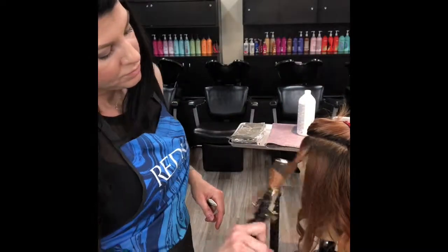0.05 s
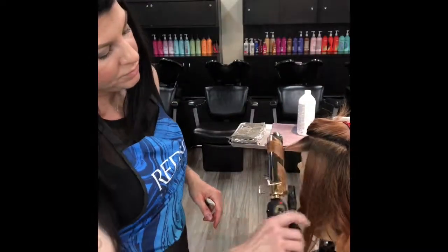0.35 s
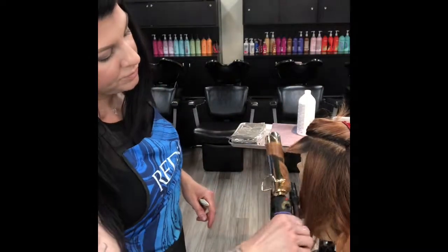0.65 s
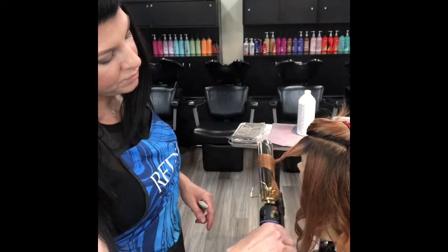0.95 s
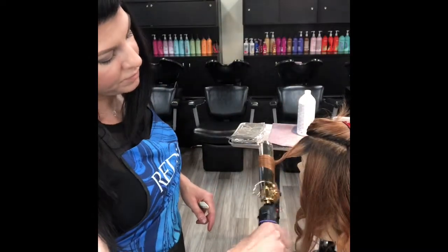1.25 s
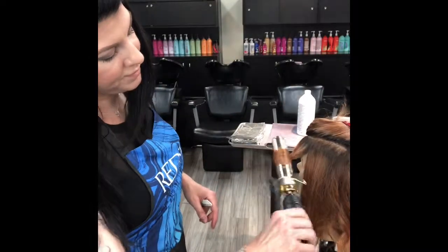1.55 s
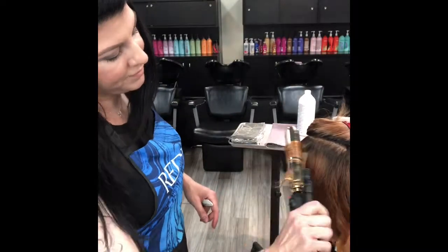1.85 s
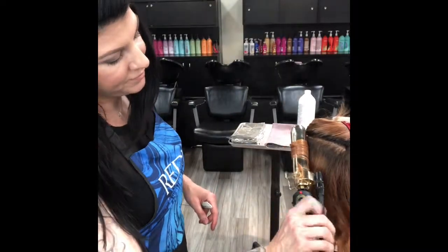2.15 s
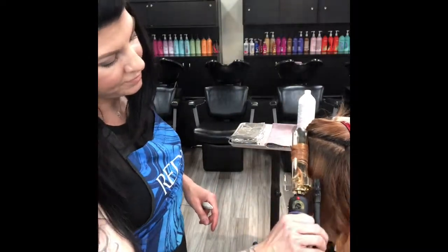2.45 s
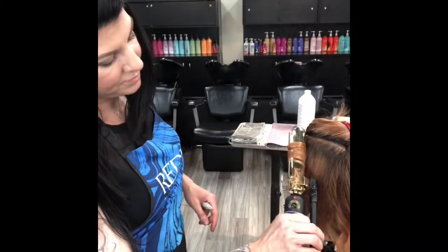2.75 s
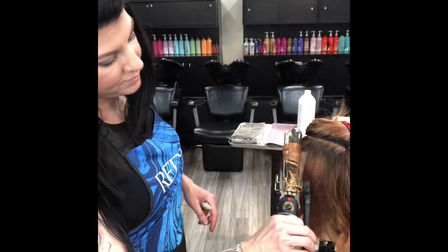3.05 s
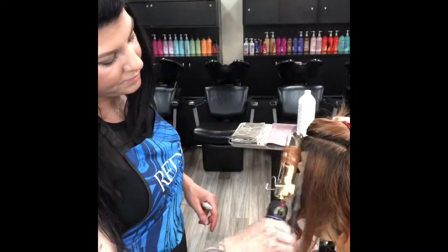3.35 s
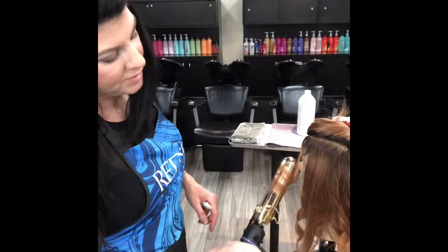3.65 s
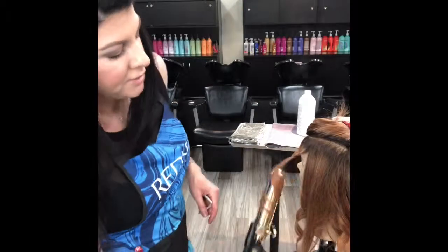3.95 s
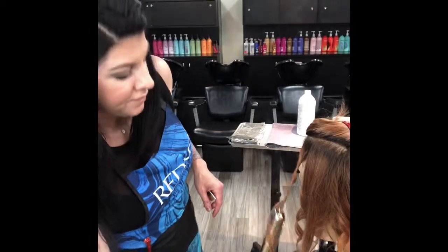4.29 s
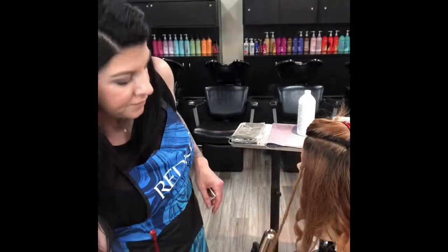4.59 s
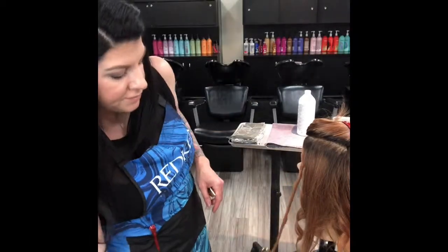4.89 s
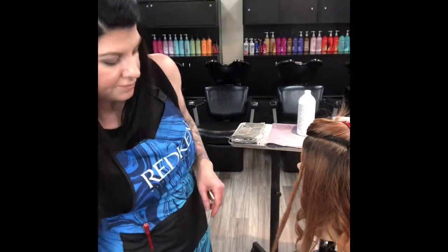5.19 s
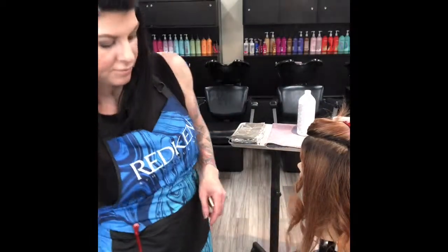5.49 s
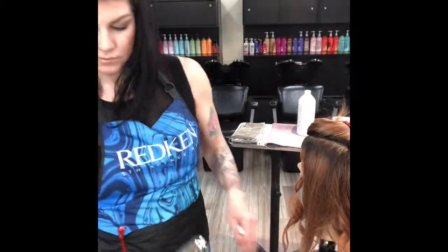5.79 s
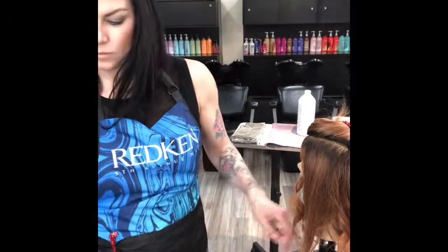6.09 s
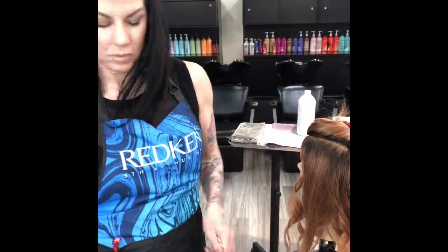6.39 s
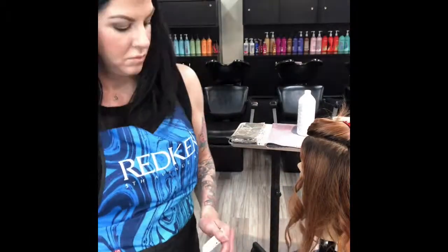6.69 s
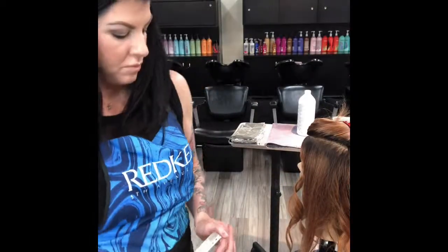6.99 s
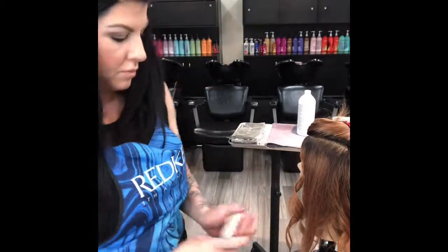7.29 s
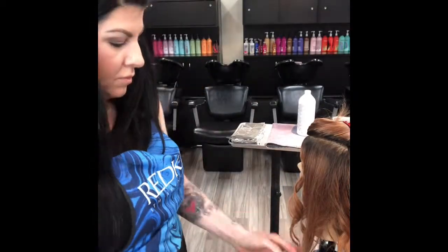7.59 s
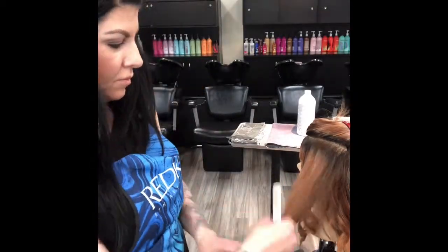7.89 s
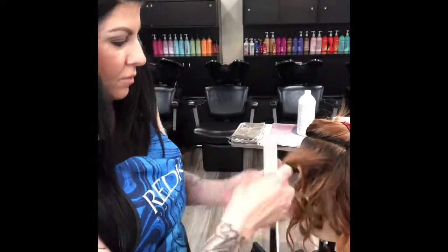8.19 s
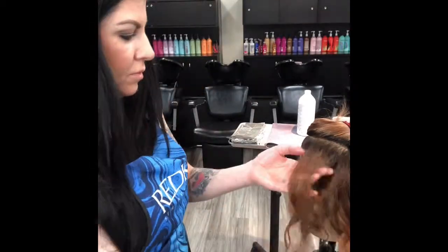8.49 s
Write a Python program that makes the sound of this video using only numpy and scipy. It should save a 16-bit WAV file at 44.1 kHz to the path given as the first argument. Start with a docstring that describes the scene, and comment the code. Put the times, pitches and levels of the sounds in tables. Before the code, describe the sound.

A curling iron clicks faintly in hair over low ventilation, then is put down with a loud clatter.

```python
"""Small scratchy ticks and a soft rustle come from close by: a curling iron turns in hair in a quiet salon.
Impacts in its sprung clamp and handle excite brief resonances, hair and clothes hiss with friction,
and the emptied clamp snaps shut. Then the iron is put down with a loud clatter, each landing ringing
the work station and the iron's steel stand. Under it all runs the low rush of the ventilation."""
import sys
import numpy as np
from scipy import signal
from scipy.fft import rfft, irfft
from scipy.io import wavfile
from scipy.ndimage import uniform_filter1d

SR = 44100
rng = np.random.default_rng(int(sys.argv[2]) if len(sys.argv) > 2 else 0)


def to_wav(s):
    """Save 16-bit WAV."""
    ch = np.atleast_2d(s).T  # columns
    pcm = np.round(np.clip(ch, -1, 1) * 32767)  # PCM
    wavfile.write(sys.argv[1], SR, pcm.astype(np.int16))


N = 376702
RING_T = np.arange(SR // 5) / SR  # time axis of one impact, in seconds

# Modes of the iron's barrel. Each row: frequency in Hz, level in dB, 60 dB decay time (t60) in seconds.
BARREL_MODES = [(2190, -11, 0.14), (2400, 0, 0.045), (2940, -13, .14), (3520, -10.5, 0.077),
                (4090, -16, 0.058), (5600, -11, 0.11), (5800, -8, 0.092), (6196, -26, 0.15),
                (7200, -21, .15), (10600, -22, 0.12)]
# Spectrum of metal striking a hard surface. Each row: frequency in Hz, spectral level in dB.
CRACK_SPECTRUM = [(100, 0), (900, -0.5), (1800, -4.5), (3500, -5), (5000, -7), (7300, -9.5), (8500, -12.5),
                  (16000, -17.5)]
# Friction spectrum of hair, also lent to the rattles. Each row: frequency in Hz, spectral level in dB.
HAIR_SPECTRUM = [(200, -23.5), (700, 7), (1500, 5), (2600, 2), (5000, -0.5), (7500, -5), (8500, -10.5),
                 (12000, -12), (16000, -12.5)]


def clamp_ticks(level_db=-1.57, notes_db=-1, barrel_db=-24, spring_db=-17, bounce_db=-10,
                part_t60=.019, spring_t60=.013, spring_hz=(10770, 15700)):
    """Impact excitation: a part of the clamp or handle bites and bounces, ringing barrel and spring too."""
    # Each row: start in seconds, level in dB, tilt in dB per octave, chatter t60 and rise time in
    # seconds, main note in Hz, its relative level in dB, second note in Hz, its relative level in dB.
    ticks = [(.065, -81.5, -11.5, 0.057, .003, 1150, 5, 1390, -1),
             (.114, -62.5, -0.5, .029, 0.00053, 5400, -3, 1900, -2),
             (0.145, -61.5, -1, .03, 0.0011, 2020, 3.5, 720, -1),
             (.179, -73, -2, .025, .001, 2050, -2, 3170, -2),
             (.266, -72, 6.5, 0.055, .0005, 5300, 1, 15000, -2),
             (.279, -70.5, 3, .04, .001, 5950, -3, 1500, -1), (.315, -68, 4, 0.049, .002, 1030, 5, 1300, 1),
             (.341, -71, 0, 0.022, .001, 1740, -1, 1450, -3),
             (.352, -70.5, 2, .045, .002, 3190, -5, 1750, -2),
             (.376, -70.5, 4, 0.034, .002, 1550, 3, 2590, -9),
             (.665, -78.5, 4, .025, .001, 4840, -2, 15000, -3),
             (.694, -72.5, -1.5, 0.1, .001, 3330, -4, 1720, -8),
             (1.068, -75, -2, .026, .002, 4550, -1, 1870, -3),
             (1.256, -80, 3, .04, .002, 5860, -7, 3900, -5),
             (1.341, -73, 4.5, .081, .001, 5030, -1, 3690, -9),
             (1.403, -71, 2, .06, .003, 5770, -3, 3600, -5),
             (1.412, -63.5, -0.5, 0.024, 0.0013, 1670, -1, 1310, -3),
             (1.44, -71, -1, .04, .003, 2540, 3, 1900, -1), (1.478, -83, -2, .03, .002, 1500, -2, 2700, -5),
             (1.5, -65, -2.5, 0.011, 0.00079, 1300, -3, 3930, -4),
             (1.529, -76, -6, .02, .0015, 920, 2, 1480, 0),
             (1.563, -69.5, 6.5, 0.024, .001, 6250, -4, 2780, -4),
             (1.63, -63.5, -1.5, 0.027, 0.00041, 1020, 4.5, 3060, -3),
             (1.641, -68, -0.5, 0.039, .0015, 1140, 0, 2530, -5),
             (1.75, -66.5, -2, .051, .003, 3000, -2, 1230, -8),
             (1.765, -62.5, 0, .045, .0025, 1350, -1, 3470, -2),
             (1.779, -62.5, 2.5, .026, .0007, 6000, -5, 3900, -2),
             (1.8, -72, -3.5, .023, .001, 1335, 4, 1900, -2),
             (1.837, -73, -2, .025, .002, 2340, 4, 1100, 2), (1.852, -71, -4, 0.036, .001, 760, 2, 1140, 0),
             (1.923, -69.5, -1.5, 0.091, .001, 1280, -2, 2214, -4),
             (2.012, -65, 3.5, 0.05, .001, 3910, -5, 15000, -6),
             (2.215, -70, 5, .072, .002, 1340, -4, 6080, -9),
             (2.236, -64.5, 2, .1, .002, 5830, -9, 1770, -11),
             (2.359, -72, 2.5, 0.095, .003, 2490, -7, 4840, -5),
             (2.417, -75, 0, .02, .001, 5600, -5, 1490, -6),
             (3.4488, -70, 5, .028, .0005, 2540, -7, 870, -5),
             (3.462, -66, 3, 0.044, .003, 2330, 0, 4940, -11),
             (3.469, -68, 1.5, .03, .001, 1410, 0, 5000, -8),
             (3.652, -69, 3, 0.02, .0015, 5600, -3, 12600, -4),
             (3.718, -73, 3, .02, .001, 1150, 2, 3100, -5),
             (3.745, -69, 1.5, .026, .001, 5600, -1, 3150, -8),
             (3.805, -77, 4, .015, .001, 5800, -6, 12000, -6),
             (3.812, -68.5, 4.5, 0.034, .0015, 5830, -5, 15000, -4),
             (3.8305, -61.5, -1, .02, .0004, 1090, 4.5, 3670, -2.5),
             (3.8315, -68, -5.5, .02, .0006, 1320, 5, 880, 5),
             (3.9, -69.5, -4.5, .018, .0007, 2390, 2.5, 1330, 1),
             (3.985, -73, 3, 0.052, .001, 3700, 2, 1420, -3), (4.002, -81, 5, .02, .001, 9500, 0, 2400, -6),
             (4.035, -63, -1, 0.022, 0.001, 2450, -4, 1400, -11),
             (4.143, -77.5, 3, .025, .001, 3930, 3, 12300, -4),
             (4.246, -68, 2.5, .04, .001, 4030, -1, 7970, -5),
             (4.276, -68.5, -1, .048, .001, 1640, -2, 970, -6),
             (4.4276, -63, 4, .018, .0004, 5490, 0, 5840, -4),
             (5.034, -73, 6, .038, 0.00063, 8840, -4, 6340, -6),
             (5.387, -67, 4.5, 0.02, .0007, 5780, -1, 11100, -10),
             (6.005, -81, 8, .025, .001, 8350, -2, 5480, -4),
             (6.017, -76, 5.5, 0.037, 0.0018, 3700, 3, 5600, 3),
             (6.085, -72, 4.5, 0.018, .001, 6450, -2, 9030, -5),
             (6.221, -73.5, -5, .025, .002, 1390, 3, 1740, 1),
             (6.262, -66, 2.5, .045, 0.0034, 4650, 5, 7080, -5),
             (6.324, -69, 3, 0.043, .001, 4640, -4, 1860, -5),
             (6.3493, -68.5, 1, .012, .0003, 4470, 3, 1570, -7),
             (6.412, -77.5, 5, .03, .001, 8100, -2, 3770, -3),
             (6.446, -80, 5, .02, .001, 8900, -2, 13000, -7)]
    edges_hz = [720, 1800, 7000, 16000]  # limits of the body, middle and treble bands
    balance_db = [-2.5, 0.5, -8]  # levels of those bands before the tilt
    out = np.zeros(N)
    for start, db, tilt_db, t60, rise_s, main_hz, main_db, second_hz, second_db in ticks:
        rise = 1 - np.exp(-RING_T / max(rise_s, .0001))
        crack = amp(8) * contact(t60=.0071, clump_db=3.5) + contact(t60, clump_db=7)
        bounce_s = rng.uniform(.003, .0073)  # the loose clamp touches again
        add(crack, bounce_s, amp(bounce_db) * contact(t60, clump_db=8))
        spring = ring([(hz, 0, spring_t60) for hz in rng.uniform(*spring_hz, size=5)])
        metal = amp(barrel_db) * ring(BARREL_MODES) + amp(spring_db) * spring
        hit = unit_hit(colour(crack, CRACK_SPECTRUM)) + metal
        click = tilt_bands(rise * hit, edges_hz, balance_db, tilt_db, pivot_hz=3460)
        notes = amp(main_db) * unit_hit(rise * struck_part(main_hz, part_t60))
        notes += amp(second_db) * unit_hit(rise * struck_part(second_hz, part_t60))
        add(out, start + .0006, amp(level_db + db) * (click + amp(notes_db) * notes))
    return out


def loose_parts(level_db=-8, rattles_per_s=64, spread_db=4, t60=.0089, crack_db=-5):
    """Random collisions: spring and stand chatter as the iron turns, louder as the hair slides faster."""
    # The iron turns in the hand. Each row: start and end in seconds.
    turns = [(0.049, .38), (1.347, 2.04), (3.689, 4.12), (6.22, 6.36)]
    out = np.zeros(N)
    for start, end in turns:
        for when, size, pitch in rng.random((int(rattles_per_s * (end - start)), 3)):
            s, hz = start + when * (end - start), 850 * 4 ** pitch
            note = ring([(hz, 0, t60), (2 * hz, -4, t60)])
            crack = amp(crack_db) * unit_hit(colour(contact(t60), HAIR_SPECTRUM))
            db = level_db + spread_db * min(-np.log(1 - size), 2)
            add(out, s, amp(db) * stroke_strength(s) * unit_hit(note + crack))
    return out


def clamp_snaps(crack_db=-1):
    """Free vibration after a blow: the sprung clamp rings the bare barrel, its lever the hollow handle."""
    # Each row: start in seconds, level in dB, barrel share and handle share (0-1), contact t60 in seconds.
    snaps = [(.951, -66.5, 0.1, 0.9, .01), (4.539, -55.5, 0.53, 0.04, 0.099), (4.62, -51, 0.05, 0.67, 0.01)]
    # Modes of the handle. Each row: frequency in Hz, level in dB, t60 in seconds.
    handle_modes = [(447, -7.5, 0.086), (571, -2, 0.077), (650, -10, 0.069), (876, -1.5, 0.021),
                    (1050, -13, 0.015), (1360, -9, 0.019)]
    # Crack of steel. Each row: frequency in Hz, spectral level in dB.
    steel = [(600, -18), (1300, -1), (2400, 1), (3700, -2), (6000, -5.5), (8500, -16.5), (16000, -31)]
    out = np.zeros(N)
    for start, db, barrel, handle, t60 in snaps:
        crack = amp(crack_db) * (1 - handle) * unit_hit(colour(contact(t60, clump_db=2), steel))
        add(out, start, amp(db) * (crack + barrel * ring(BARREL_MODES) + handle * ring(handle_modes)))
    return out


def landings(level_db=-5.5, station_db=-1, spot_t60=.043, rise_s=.0012, pivot_hz=862, push_hz=159.6):
    """Modal superposition: each landing rings the station, the struck spot and the stand over a thud."""
    # Each row: start in seconds, level in dB, tilt in dB per octave, relative push level in dB, contact
    # t60 in seconds, note of the struck spot in Hz, relative levels of that note and of the stand in dB.
    knocks = [(6.6342, -33.5, 0.6, -18, .045, 894, -3, -5.5), (6.683, -40, -2, -30, 0.087, 290, -1, -5.5),
              (6.691, -39.5, 1, -34.5, 0.028, 1367, -3, -9),
              (6.778, -51.5, -3.5, -29, 0.077, 694, -6, -10.5), (6.812, -49, -2, -26, 0.39, 322, -5, -15.5),
              (6.862, -36.5, -5.5, -20, 0.056, 293, 2.5, -12.5),
              (6.8709, -46.5, 2.5, -22.5, .048, 640, 1, -10.5), (6.883, -41, -2, -34, .084, 720, -0.5, -3),
              (6.91, -50, 4, -17.5, .14, 706, -10.5, -7), (6.9166, -28, 1, -19, 0.06, 790, 3, -8.5),
              (6.928, -28, 0, -22.5, 0.044, 1293, 4, 4), (6.9325, -33.5, 0.5, -27.5, .03, 3710, -1, 0.5),
              (6.9496, -27, 1, -20.5, .055, 480, 0, -9.5), (6.9515, -25, -1, -20, 0.07, 560, -1, -10.5),
              (6.965, -32, 0.7, -18, 0.14, 640, -1.5, -5), (6.996, -32.5, 0.5, -19, 0.067, 660, -4, -15),
              (7.015, -43.5, -4.5, -11.5, 0.092, 900, -18, -3), (7.037, -37, -2, -28, .14, 632, 0, -10),
              (7.058, -42.5, -4.5, -24, 0.062, 300, 5.5, -18), (7.125, -55, -1.5, -27.5, 0.21, 517, 4, -4),
              (7.171, -60, -3.5, -20, 0.045, 420, 1, -0.5)]
    # Modes of the work station. Each row: frequency in Hz, level in dB.
    station_modes = [(200, -6), (255, -2.5), (292, 2), (330, 2.5), (385, 1.5), (432, 1), (493, -7.5),
                     (590, 2.5), (648, -1), (705, -5.5), (797, -7), (834, -2.5), (888, -6.5), (1077, -2.5),
                     (1190, -8), (1330, -3.5), (2290, 5.5), (2640, -0.5), (3982, -6), (6863, -1)]
    # Damping of the station. Each row: frequency in Hz, t60 in seconds.
    station_t60 = [(180, .16), (290, .16), (450, .11), (850, .075), (1300, .055), (2400, .04), (7000, .025)]
    # Modes of the steel stand. Each row: frequency in Hz, level in dB, t60 in seconds.
    stand_modes = [(1264, 1.5, .045), (1538, -5.5, 0.066), (2006, 1.5, 0.038), (2138, -4.5, .045),
                   (2453, 0, 0.064), (3200, 1, 0.033), (3590, -0.5, .035), (4000, -6.5, .04),
                   (4470, -12.5, .08), (5400, -7, .03), (5700, -13.5, 0.074)]
    edges_hz = [215, 450, 1600, 5000, 16000]  # limits of the thud, knock, clack and treble bands
    balance_db = [-2.5, 1.5, -4, -7.5]  # levels of those bands before the tilt
    # Dull push on the station's top. Each row: frequency in Hz, spectral level in dB.
    push_spectrum = [(25, -36), (42, -21), (60, -7), (100, -8.5), (175, 3), (235, -2.5), (600, -36.5)]
    rise = 1 - np.exp(-RING_T / rise_s)  # the ringing builds up while the iron presses on
    out = np.zeros(N)
    for start, db, tilt_db, push_db, t60, spot_hz, spot_db, stand_db in knocks:
        load = 1 + .008 * rng.standard_normal(len(station_modes))  # the iron's weight detunes the top
        station = [(hz * k, mode_db, read(station_t60, hz))
                   for (hz, mode_db), k in zip(station_modes, load)]
        crack = unit_hit(colour(contact(t60, clump_db=4), CRACK_SPECTRUM))
        knock = tilt_bands(crack + amp(station_db) * ring(station), edges_hz, balance_db, tilt_db, pivot_hz)
        strain = 1 + .02 * rng.standard_normal(len(stand_modes))  # the wire bends anew at every landing
        stand = [(hz * k, mode_db, decay) for (hz, mode_db, decay), k in zip(stand_modes, strain)]
        spot = amp(spot_db) * unit_hit(rise * struck_part(spot_hz, spot_t60))
        clank = amp(stand_db) * unit_hit(rise * ring(stand))
        push_gain = amp(push_db + tilt_db * np.log2(push_hz / pivot_hz))
        push = push_gain * unit_hit(colour(contact(t60=.041), push_spectrum))
        add(out, start, amp(db) * (knock + spot + clank + push))
    return amp(level_db) * out


def stand_rattle(start=6.956, end=7.03, level_db=-43, fade_db_per_s=115, rattles_per_s=130,
                 t60=.024, crack_db=-2, spread_db=1.5):
    """Collisions that lose energy: stand, clamp and spring jangle together as the iron topples."""
    out = np.zeros(N)
    for k, (when, size, pitch) in enumerate(rng.random((int(rattles_per_s * (end - start)), 3))):
        delay = (k + when) / rattles_per_s
        note = struck_part(800 * 4 ** pitch, t60)
        crack = amp(crack_db) * unit_hit(colour(contact(t60), HAIR_SPECTRUM))
        db = level_db - fade_db_per_s * delay + spread_db * (2 * size - 2)
        add(out, start + delay, amp(db) * unit_hit(note + crack))
    return out


def stand_scrapes(bandwidth_hz=350):
    """Friction drives a narrow resonance: the steel stand scrapes and squeaks over the station."""
    # Each row: start and end in seconds, level in dB, squeak frequency in Hz.
    drags = [(6.804, 6.842, -66.5, 4750), (6.87, 6.918, -61.5, 6900)]
    out = np.zeros(N)
    for start, end, db, hz in drags:
        friction = rng.standard_normal(round((end - start) * SR))
        squeak = signal.lfilter(*signal.iirpeak(hz, hz / bandwidth_hz, SR), friction)
        scrape = unit(unit(squeak) + unit(colour(friction, CRACK_SPECTRUM)))
        add(out, start, amp(db) * scrape * signal.windows.tukey(len(scrape), .3))
    return out


def rustle(level_db=-.5, crackle_db=-9, catches_per_s=130, spread_db=4, catch_t60=.0224):
    """Stick-slip friction: strands and cloth slide with a soft hiss and catch in tiny crackles."""
    level = amp(level_db) * stroke_strength(np.arange(N) / SR)
    onsets = rng.random(N) < catches_per_s / SR
    catches = onsets * amp(spread_db * np.minimum(rng.exponential(1, N), 3.5))
    envelope = signal.fftconvolve(catches, amp(-60 * RING_T / catch_t60))[:N]
    crackle = unit(envelope * rng.standard_normal(N))
    return level * unit(colour(rng.standard_normal(N) + amp(crackle_db) * crackle, HAIR_SPECTRUM))


def stroke_strength(s, resting_db=-75.5):
    """Incoherent sources add in power: at times s, arched strokes swell over a faint steady sliding."""
    # Strokes of hand, hair and clothes. Each row: middle and length in seconds, peak level in dB.
    strokes = [(0.018, 0.53, -71.5), (.5, .5, -79), (1.5, 0.38, -72.5), (2.118, 0.44, -78),
               (3.583, 0.42, -69), (4, 0.99, -76), (4.496, 0.66, -75), (5.825, 0.7, -70),
               (6.265, 0.29, -72.5), (7.305, 0.44, -67.5), (7.596, 0.31, -71), (8.041, 0.51, -75),
               (8.407, 0.24, -75)]
    middle, length, db = np.transpose(strokes)[:, :, None]
    arches = amp(db) * np.cos(np.pi * np.clip((s - middle) / length, -.5, .5))
    return np.sqrt(amp(resting_db) ** 2 + (arches ** 2).sum(0))


def salon_reverb(x, build_s=.0036):
    """Reverberation: diffuse reflections build up quickly and decay exponentially, the treble first."""
    # Each row: frequency in Hz, reverberation time in seconds.
    room_t60 = [(100, 0.33), (300, 0.57), (700, 0.39), (2000, 0.36), (5000, 0.36), (8000, 0.29),
                (15000, 0.091)]
    hz, t, noise = signal.stft(rng.standard_normal(SR), SR, nperseg=256)
    decay = amp(-60 * t / read(room_t60, hz)[:, None])
    tail = signal.istft(noise * decay, SR, nperseg=256)[1]
    tail *= 1 - np.exp(-np.arange(len(tail)) / SR / build_s)
    return signal.fftconvolve(x, tail / np.linalg.norm(tail))[:N]


def ventilation(level_db=-64.5, waver_db=1.83, waver_hz=400, waver_width_hz=220):
    """Broadband flow noise: a low rush of air with a faint hiss; its hollow middle wavers."""
    # Each row: frequency in Hz, spectral level in dB.
    air_spectrum = [(15, -50.5), (25, -25.5), (45, -11.5), (108, -3.5), (195, -1), (223, -3.5), (256, -0.5),
                    (293, -2), (317, -1), (427, -1.5), (624, -10.5), (1400, -20.5), (2110, -27.5),
                    (7710, -31), (14400, -38.5), (16000, -45.5)]
    hz = np.fft.rfftfreq(N, 1 / SR)
    air = rfft(rng.standard_normal(N)) * amp(read(air_spectrum, hz))
    middle = irfft(air * np.exp(-((hz - waver_hz) / waver_width_hz) ** 2), N)
    drift = unit(uniform_filter1d(rng.standard_normal(N), size=2600))
    return amp(level_db) * unit(irfft(air, N) + (amp(waver_db * drift) - 1) * middle)


def contact(t60, clump_db=5):
    """Contact noise: two hard parts meet in tiny impacts that come in clumps and die away."""
    clumps = unit(uniform_filter1d(rng.standard_normal(len(RING_T)), size=40))
    envelope = amp(clump_db * np.clip(clumps, -2, 1) - 60 * RING_T / t60)
    return envelope * rng.standard_normal(len(RING_T))


def ring(modes):
    """Damped modes (Hz, dB, t60): the spot struck sets their strength and sign, here drawn at random."""
    hz, db, t60 = np.transpose(modes)[:, :, None]
    strength = rng.choice([-1, 1], hz.shape) * amp(db + 2 * rng.standard_normal(hz.shape))
    decay = amp(-60 * RING_T / t60)
    return unit_hit((strength * decay * np.sin(2 * np.pi * hz * RING_T)).sum(0))


def struck_part(hz, t60):
    """A mode cluster: one main mode between two weaker, shorter ones that shift with every touch."""
    below, above = 1 + rng.uniform(.04, .16, 2)
    return ring([(hz, 0, t60), (hz / below, -6, .6 * t60), (hz * above, -6, .6 * t60)])


def tilt_bands(hit, edges_hz, balance_db, tilt_db, pivot_hz):
    """Spectral tilt, in dB per octave about a pivot: a harder blow favours the higher bands."""
    out = 0
    for limits, db in zip(zip(edges_hz, edges_hz[1:]), balance_db):
        band = signal.sosfilt(signal.butter(3, limits, "band", fs=SR, output="sos"), hit)
        octaves = np.log2(np.sqrt(np.prod(limits)) / pivot_hz)
        out = out + amp(db + tilt_db * octaves) * unit_hit(band)
    return out


def colour(x, spectrum, size=4096):
    """Minimum-phase filtering imposes a spectrum and keeps attacks sharp."""
    log_gain = np.log(amp(read(spectrum, abs(np.fft.fftfreq(size, 1 / SR)))))
    taps = np.fft.ifft(np.exp(signal.hilbert(log_gain).conj())).real[:size // 2]
    return signal.fftconvolve(x, taps)[:len(x)]


def amp(db):
    """Decibels to amplitude ratio."""
    return 10 ** (np.asarray(db) / 20)


def unit(x):
    """Normalises to rms 1."""
    return x / np.sqrt(np.mean(x ** 2) + 1e-30)


def unit_hit(x):
    """Normalises a hit to rms 1 over its first 30 ms."""
    return x / np.sqrt(np.mean(x[:SR * 3 // 100] ** 2) + 1e-30)


def read(points, hz):
    """Interpolates a table on a log-frequency axis."""
    table_hz, value = np.transpose(points)
    return np.interp(np.log(hz + 1), np.log(table_hz), value)


def add(mix, start, sound):
    """Superposes a sound on the mix from a start in seconds."""
    part = mix[max(round(start * SR), 0):][:len(sound)]
    part += sound[:len(part)]


def scene(tick_room_db=-11, snap_room_db=-9, clatter_room_db=-10):
    """Superposition: the iron's direct sound and its reverberation, the rustle and the ventilation."""
    ticks = clamp_ticks() + loose_parts()
    snaps = clamp_snaps()
    clatter = landings() + stand_rattle() + stand_scrapes()
    into_room = amp(tick_room_db) * ticks + amp(snap_room_db) * snaps + amp(clatter_room_db) * clatter
    return (ticks + snaps + clatter + salon_reverb(into_room) + rustle() + ventilation())[None]


def record(dry):
    """Band limiting: a linear-phase low-pass removes the treble above about 16 kHz."""
    lowpass = signal.firwin(511, 16050, window=("kaiser", 9), fs=SR)
    return signal.oaconvolve(dry, lowpass[None], "same")


dry = scene()
out = record(dry)
to_wav(out)
```